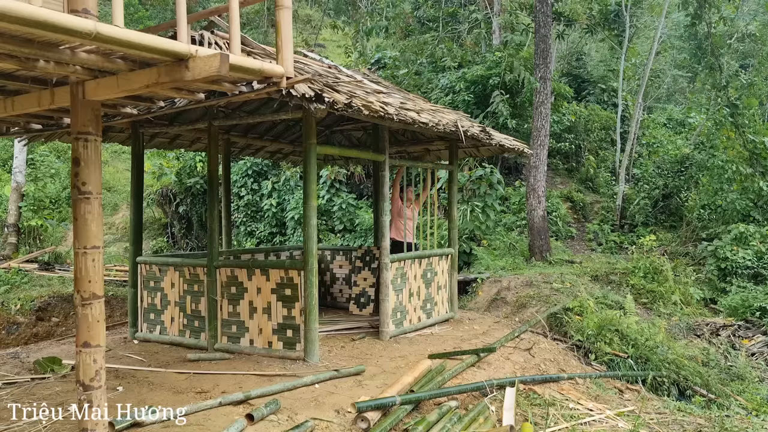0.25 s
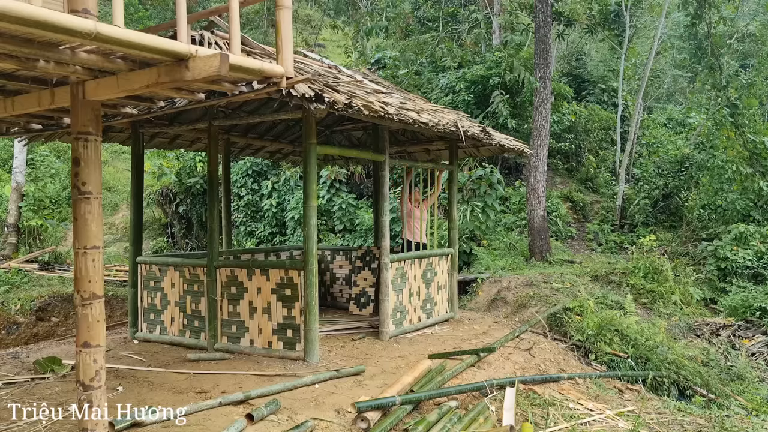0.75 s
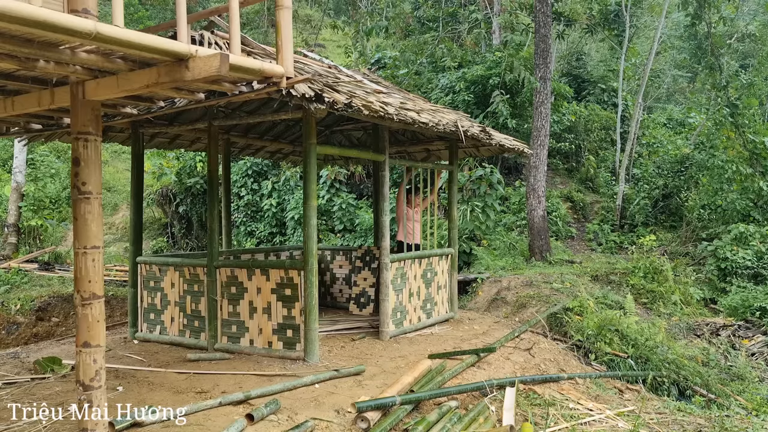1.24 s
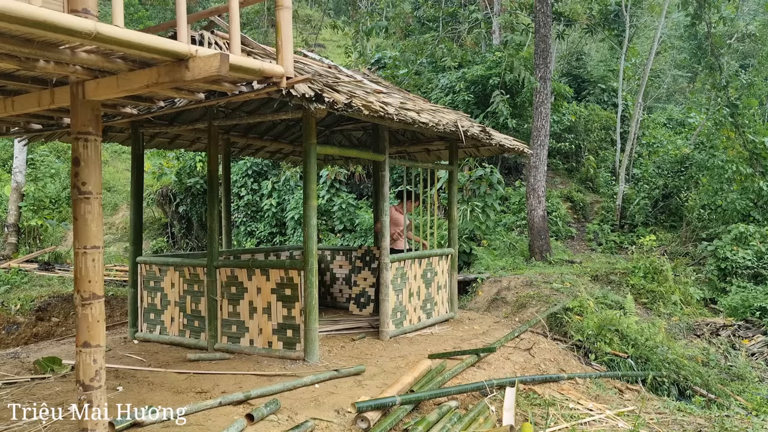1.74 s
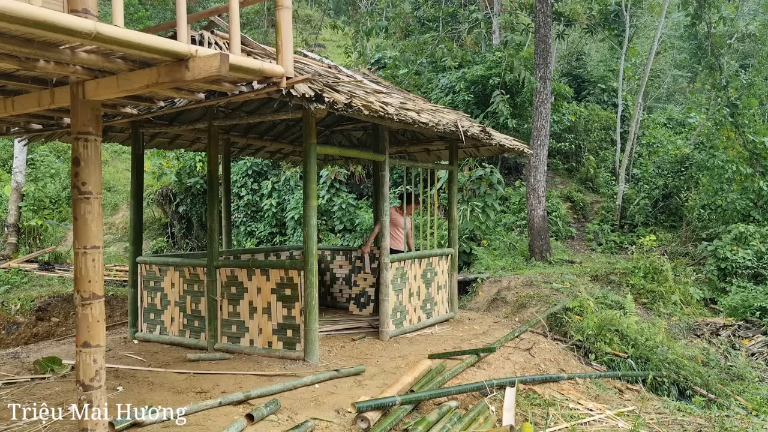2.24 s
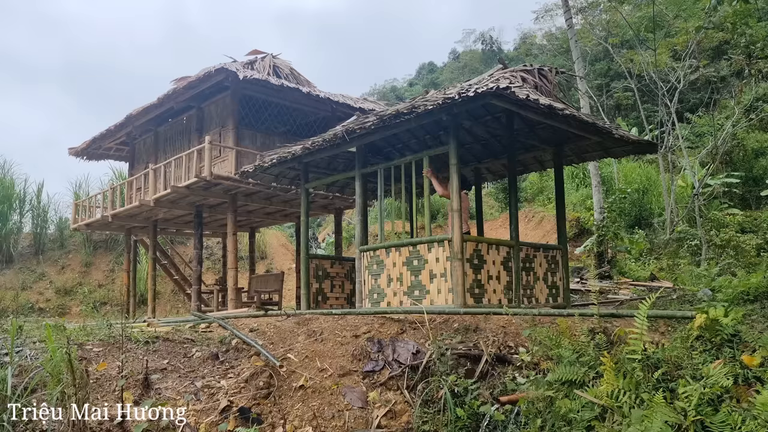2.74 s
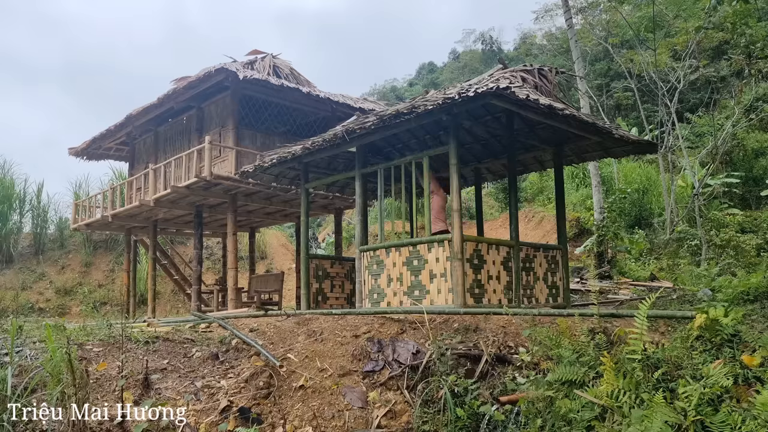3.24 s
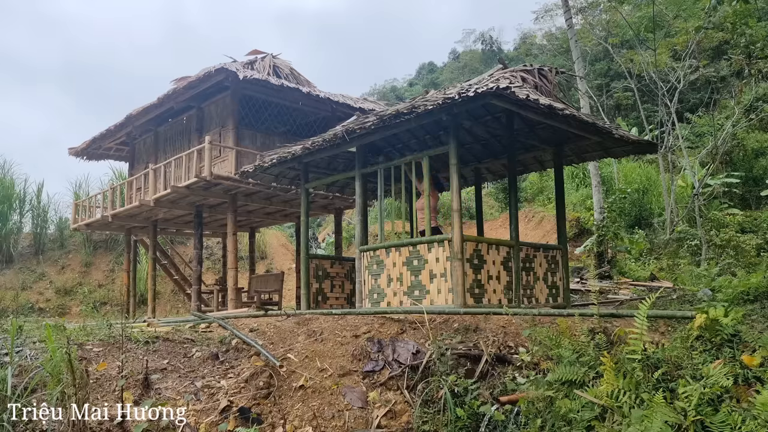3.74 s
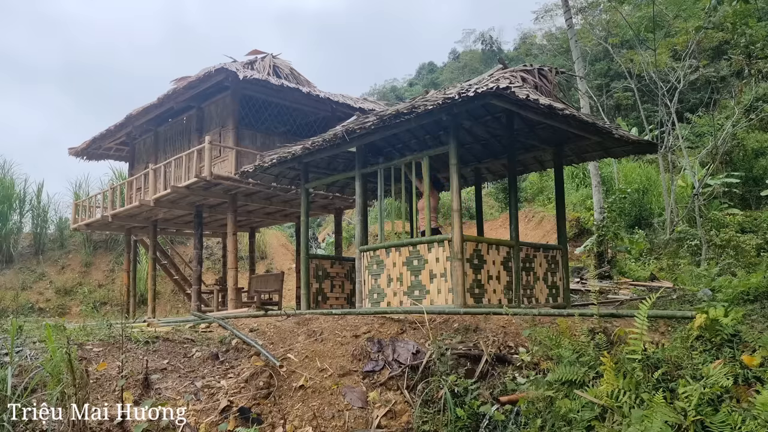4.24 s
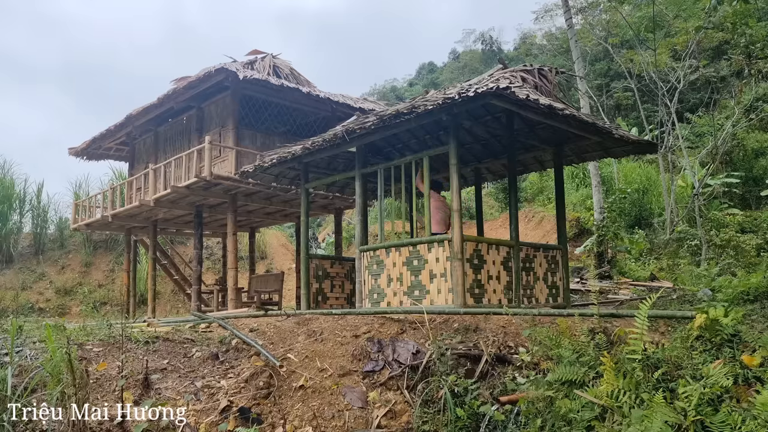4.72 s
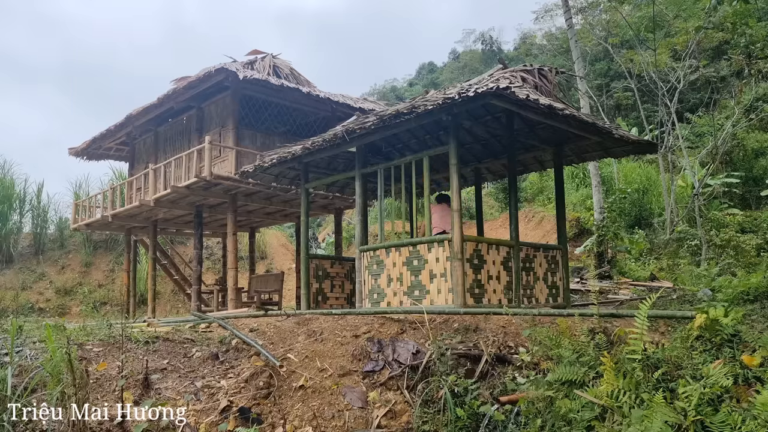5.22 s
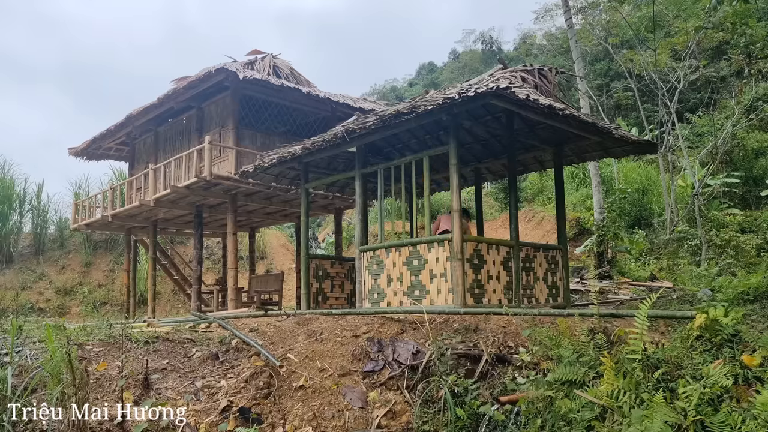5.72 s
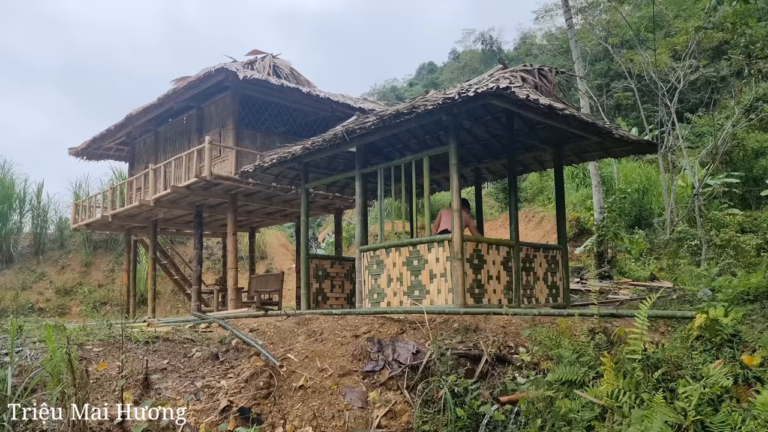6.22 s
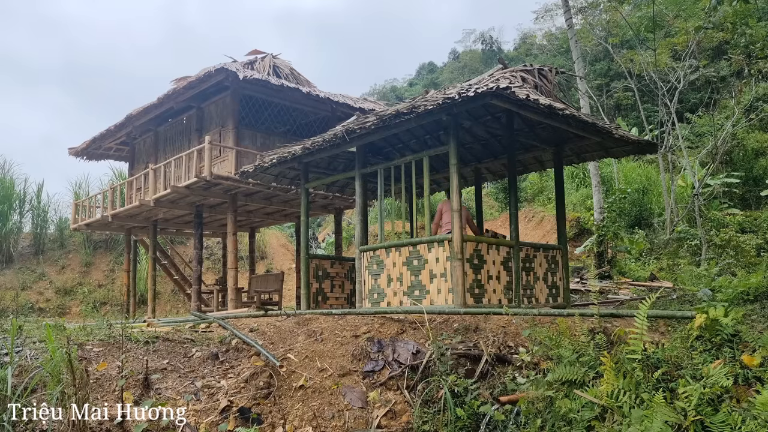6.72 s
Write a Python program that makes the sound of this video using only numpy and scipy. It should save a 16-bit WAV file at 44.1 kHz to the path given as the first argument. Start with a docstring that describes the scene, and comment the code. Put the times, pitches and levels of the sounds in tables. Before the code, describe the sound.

Sparse woody bamboo clacks and small taps over faint forest hiss; midway the ambience grows louder with cricket and cicada, then a pole scrapes.

```python
"""A faint forest hiss, soft hollow blips and a steady insect chorus open the scene: coloured, flickering noise,
small tuned taps and a narrow noise band. Over them five hollow blows of bamboo on a shelter frame ring banks of
damped modes under a noisy crack and shake the woven walls. A second thump and a rebound follow the first blows,
with small taps of handling throughout. From 2.6 s, at a second listening spot, the hiss is louder, the chorus
grows, and a cricket, a sagging cicada and a high trill join in. Near the end a pole slides along the frame with
a dry scrape of gritty noise."""
import sys
import numpy as np
from scipy import signal
from scipy.fft import rfft, irfft, next_fast_len
from scipy.io import wavfile
from scipy.ndimage import uniform_filter1d, map_coordinates

SR = 44100
rng = np.random.default_rng(int(sys.argv[2]) if len(sys.argv) > 2 else 0)


def transcribe(u):
    """Save the signal u as a 16-bit wav file named by the first command-line argument.

    u: samples, shape (n,) or (channels, n), limited to [-1, 1]; the rate is SR.
    q: integer samples, one column per channel.
    """
    v = np.clip(np.atleast_2d(u).T, -1, 1)
    q = np.round(v * 32767).astype(np.int16)
    wavfile.write(sys.argv[1], SR, q)


N = 307377  # length in samples

# Colour of the hiss at the first spot: [f/Hz, level per Hz/dB]
NEAR_HISS = [(25, -58), (62, -13), (100, -9.5), (160, -19), (220, -6.5), (380, -10), (560, -2.5),
             (850, -8.5), (1300, -8.5), (2000, -11.5), (4000, -16), (7500, -22.5), (9500, -28),
             (15500, -28)]
# Colour of the hiss at the second spot: [f/Hz, level per Hz/dB]
FAR_HISS = [(25, -62), (45, -45), (70, -12), (150, -14), (220, -6.5), (350, -10.5), (800, -11.5),
            (1500, -16), (3200, -8), (4700, -21), (7000, -15), (9000, -22), (11200, -27), (13000, -18.5),
            (15500, -24)]
# Broad resonances added to the second hiss: [f/Hz, width/Hz, level/dB]
FAR_HISS_HUMPS = [(222, 61, 9), (526, 136, 8), (1110, 170, 13), (1626, 396, 13.5), (2260, 260, 8)]
# Left-right likeness of the open air: [f/Hz, likeness 0..1]
AIR_LIKENESS = [(100, 0.87), (290, 0.96), (640, 0.13), (1400, 0), (15000, 0)]
# Depth of the flutter in the hiss: [f/Hz, share of full depth]
FLUTTER_DEPTH = [(100, 0.25), (250, 0.62), (3000, 0.8), (9000, 0.68)]
# Colour of the leaf rustle: [f/Hz, level per Hz/dB]
RUSTLE_COLOUR = [(150, -29), (500, -4.0), (1600, -19.0), (3500, -10), (8000, -22.5)]
# Colour of the leaf ticks: [f/Hz, level per Hz/dB]
TICK_COLOUR = [(800, -33), (3000, 9.0), (15000, -1.0)]
# Left-right likeness of knocks and taps: [f/Hz, likeness 0..1]
KNOCK_LIKENESS = [(100, 0.99), (300, 0.82), (700, 0.068), (1400, 0.01), (3000, 0.28), (7000, 0.069)]
# The five blows: [t/s, clack level/dB, hollow level/dB, crack level/dB, snap level/dB,
# wall thump level/dB, wall rattle level/dB, hollow f/Hz, rise/s, pole number]
BLOWS = [(0.0612, -26.5, -34.5, -30.5, -47, -45, -41, 360, 0.0053, 3),
         (0.7568, -18, -32.5, -22.5, -34.5, -47.5, -43, 283, 0.0054, 0),
         (1.0401, -26, -33, -32.5, -43, -47, -54, 284, 0.0062, 4),
         (3.6367, -21, -38, -24.5, -32, -44.5, -39, 292.5, .0005, 1),
         (4.1556, -22.5, -47, -27.5, -40.5, -49.5, -38, 290, 0.00037, 2)]
# Modes of each of the five poles: [f/Hz, relative level/dB, t60/s]
POLE_MODES = [
    [(473, -8, 0.04), (546, 4, 0.037), (608, 2, 0.046), (660, -7, 0.059), (804, -22, .1), (990, -7, 0.087),
     (1045, -6, 0.11), (1290, -5, 0.058), (1440, -9.5, 0.045), (1703, -12, 0.067), (1960, -22, .12),
     (2190, -31, 0.073), (2540, -10, 0.06), (2540, -16, 0.1), (3050, -26, 0.12), (3900, -19, 0.11),
     (5040, -20, 0.11)],
    [(606, -4.5, 0.049), (658, -15, 0.12), (705, 0.5, 0.043), (883, -4, 0.079), (970, 0, 0.12),
     (1046, -5, 0.086), (1203, 0, 0.077), (1370, 1.5, 0.058), (1580, -21, 0.052), (1740, -6.5, 0.034),
     (1955, -3.5, 0.054), (2590, -11, 0.071), (2884, -5, 0.049), (3020, -23, 0.042), (3370, -10.5, 0.064),
     (3750, -6, 0.037), (4720, -33, 0.09), (5070, -10.5, 0.057), (6370, -20, .05)],
    [(622, -13, 0.12), (720, -33, 0.059), (1020, 8.5, 0.031), (1092, 4.5, 0.054), (1376, 0, 0.033),
     (1590, -2, 0.03), (1897, -1.5, 0.028), (2335, -2, 0.044), (2570, -9, 0.057), (2880, -7.5, 0.068),
     (3370, -6, 0.033), (4400, -15, 0.051)],
    [(428, -6.5, 0.078), (530, -5, 0.039), (630, -7.5, 0.044), (823, -15, 0.11), (1030, 1, 0.083),
     (1310, -10, 0.073), (1570, -9, 0.059), (1774, 2.5, 0.031), (2696, -5, 0.053), (2990, -9.5, 0.067),
     (3960, -18, 0.12)],
    [(554, -9.5, 0.15), (616, -7, 0.13), (1007, 3.5, 0.035), (1113, -6.5, 0.1), (1344, -6, 0.11),
     (1560, -11, 0.097), (1780, -13, 0.1), (2050, -10.5, 0.092), (2560, -10, 0.063)],
]
# Colour of pole skin cracking and buzzing on the frame: [f/Hz, level per Hz/dB]
CLATTER_COLOUR = [(100, -6), (300, -5.5), (600, -4.5), (1200, 0), (1700, -5.5), (3000, -8), (5000, -15.5),
                  (7500, -15), (10000, -26), (15500, -30)]
# Dying away of the shelter's tail: [f/Hz, t60/s]
SHELTER_DECAY = [(200, 0.31), (1000, 0.21), (3000, 0.18), (10000, 0.18)]
# Colour of the echo from the trees: [f/Hz, level per Hz/dB]
TREE_COLOUR = [(200, -26), (1000, -2), (4000, -5), (15000, -27)]
# Edges of the registers hollow, clack, crack and snap, low to high: [f/Hz]
REGISTER_EDGES = (190, 450, 1600, 4500, 15800)
# Sway of the woven walls: [f/Hz, relative level/dB]
WALL_SWAY = [(56, 8), (90, -2.5), (135, -21), (178, -7), (215, -18)]
# Colour of the wall rattle: [f/Hz, level per Hz/dB]
RATTLE_COLOUR = [(25, -32), (55, 4.5), (120, -1), (180, -5.5), (300, -2.5), (450, -6.5), (800, -7), (2000, -40)]
# Clear taps: a second thump just after the first blow, a rebound after the second, then taps of handling: [t/s,
# level/dB (the first 10 ms sit 2 dB lower), f/Hz, t60/s]
CLEAR_TAPS = [(0.117, -34.5, 446, 0.053), (.56, -53, 5950, 0.011), (0.879, -46.5, 922, 0.11),
              (1.315, -47.5, 745, 0.054), (1.397, -50, 3560, 0.0085), (1.514, -43, 1100, 0.063),
              (1.731, -48, 595, 0.1), (1.933, -48, 757, 0.031), (2.571, -47.5, 557, 0.032),
              (3.387, -45.5, 1260, 0.021), (3.812, -44, 1134, 0.058), (4.259, -34, 1556, 0.027),
              (4.934, -45, 1410, .04), (5.225, -45, 554, 0.029), (6.268, -43.5, 1496, 0.066)]
# Cricket bouts: [start t/s, end t/s, level/dB]
CRICKET_BOUTS = [(2.639, 3.166, -56.5), (4.199, 7.1, -55)]
# Trills of a high bush cricket; overlapping ones add up: [start t/s, end t/s]
TRILL_BOUTS = [(2.65, 3.32), (3.42, 4.7), (3.98, 4.2)]
# Strokes of the sliding pole: [peak t/s, level/dB, rise/s, fall/s]
SLIDE_STROKES = [(5.738, -23, 0.012, 0.019), (5.775, -39, 0.038, 0.081), (5.877, -39, 0.011, 0.07)]
# Colour of the scrape: [f/Hz, level per Hz/dB]
SCRAPE_COLOUR = [(120, -37), (250, -26.5), (600, -15), (800, -10), (1150, -6), (1600, -9.5), (2800, -4),
                 (3500, -10), (4500, -11.5), (7500, -15), (10000, -24), (15500, -29)]
# Left-right likeness of the scrape: [f/Hz, likeness 0..1]
SCRAPE_LIKENESS = [(300, 1.0), (1500, 0.23), (6000, 0)]

MOVE_S = 2.645  # the background passes to the second listening spot
NEAR_DB, FAR_DB = -57, -48  # hiss at the first and the second spot
SWELL_AT_S, SWELL_WIDTH_S, SWELL_DB = 1.1, 0.37, 1.5  # one gentle swell of the first hiss
BLIPS_PER_S, BLIP_DB, BLIP_SCATTER_DB = 7, -55.5, 2
BLIP_HZ, BLIP_SCATTER_OCTAVES, BLIP_T60_S = 571, 0.192, .09
CHORUS_DB, CHORUS_GROWS_DB_PER_S = -62, 0.74  # growth begins at the second spot
LEAD_S = .02  # room for the brush ahead of each landing
HOLLOW_DB, HOLLOW_PEAK_S = -7.5, 0.011  # air in the tube: level among the modes, time to full strength
CHIRPS_PER_S, CRICKET_ATTACK_S, CRICKET_RELEASE_S = 21.14, 0.034, 0.025
CICADA_HZ, CICADA_SAG_HZ_PER_S, CICADA_DB = 7820, 1100, -60
CICADA_END_S, CICADA_ATTACK_S, CICADA_RELEASE_S = 4.33, 0.025, 0.37
TRILL_HZ, TRILL_DB, TRILL_FADE_S = 7940, -68, 0.037
TOP_HZ = 15750  # upper limit of the whole mix


def amp(db):
    """Decibels to gain."""
    return 10 ** (np.asarray(db) / 20)


def unit(x):
    """Scaled to rms 1."""
    return x / np.sqrt(np.mean(x ** 2) + 1e-20)


def along(points, hz):
    """Reads a curve of (Hz, value) points on a log frequency axis."""
    f, v = np.transpose(points)
    return np.interp(np.log(hz + 1), np.log(f + 1), v)


def wobble(rate):
    """A smooth random curve, rate knots a second."""
    knots = rng.standard_normal(int(N * rate / SR) + 4)
    return map_coordinates(knots, [np.arange(N) * rate / SR])


def filtered(x, response):
    """Shapes the spectrum of x by a response of frequency."""
    m = next_fast_len(x.shape[-1] + 8192)
    spectrum = rfft(x, m) * response(np.fft.rfftfreq(m, 1 / SR))
    return irfft(spectrum, m)[..., :x.shape[-1]]


def noise(colour, alike, size):
    """Stereo noise of rms 1: colour gives dB per frequency, the mid-side balance sets the likeness."""
    def mid_side_response(hz):
        angle = np.arccos(np.clip(along(alike, hz), -1, 1)) / 2
        return amp(colour(hz)) * np.array([np.cos(angle), np.sin(angle)])
    mid, side = filtered(rng.standard_normal((2, size)), mid_side_response)
    return unit(np.array([mid + side, mid - side]))


def coloured(points, alike, size):
    """Stereo noise coloured by a table."""
    return noise(lambda hz: along(points, hz), alike, size)


def narrow(hz, width_hz):
    """Stereo band of noise: slow noise rides on a fixed or moving pitch."""
    slow = filtered(rng.standard_normal((2, 2, N)), lambda f: 1 / (1 + (f / width_hz) ** 2))
    phase = 2 * np.pi * np.cumsum(hz * np.ones(N)) / SR
    return unit(slow[0] * np.cos(phase) + slow[1] * np.sin(phase))


def held(start, end, attack, release):
    """An envelope that rises from start, holds at 1 and has died away at end."""
    t = np.arange(N) / SR
    return np.clip(np.minimum((t - start) / attack, (end - t) / release), 0, 1)


def add(track, s, sound):
    """Mixes a sound into the track at time s."""
    part = track[:, max(round(s * SR), 0):][:, :sound.shape[1]]
    part += sound[:, :part.shape[1]]


def ring(modes, t, spread):
    """Damped sine modes with random level and phase, and a phase gap between left and right."""
    out = np.zeros((2, len(t)))
    for hz, db, t60 in modes:
        size, phase, skew = rng.standard_normal(3)
        apart = (spread * skew + 0.093) * hz / 1000 * np.array([[.5], [-.5]])
        decay = amp(db + 0.31 * size - 60 * t / t60)
        out += decay * np.sin(2 * np.pi * hz * t + np.pi * phase + apart)
    return out


def tap(db, pitch_hz, t60, scuff_db, width=0.23):
    """One damped resonance rings briefly under a soft scuff of noise around the same pitch."""
    t = np.arange(SR // 4) / SR
    scuff = noise(lambda hz: -10 * np.log10(1 + (np.log((hz + 1) / pitch_hz) / width) ** 4),
                  KNOCK_LIKENESS, len(t))
    body = ring([(pitch_hz, 3, t60)], t, spread=0.61) + scuff * amp(scuff_db - 60 * t / t60)
    sound = body * (1 - np.exp(-t / 0.0009))
    return amp(db - 2) * sound / np.std(sound[:, :SR // 100])  # level set over the first 10 ms


def patchy(x, depth_db):
    """Brief random flutters of gain across time and frequency, deepest around 3 kHz."""
    hz, _, z = signal.stft(x, SR, nperseg=256)
    field = rng.standard_normal(z.shape[1:])
    field = uniform_filter1d(field, size=4, axis=0)
    field = unit(uniform_filter1d(field, size=4, axis=1))
    depth = depth_db * along(FLUTTER_DEPTH, hz)[:, None]
    return unit(signal.istft(z * amp(depth * field), SR, nperseg=256)[1][:, :N])


def far_colour(hz):
    """Hiss of the second spot in dB: its broad slope plus resonant humps."""
    humps = sum(db / (1 + (2 * (hz - centre) / width) ** 2) for centre, width, db in FAR_HISS_HUMPS)
    return along(FAR_HISS, hz) + humps


def forest():
    """Restless hiss of the clearing as fluttering noise, with leaves rustling and ticking in it."""
    t = np.arange(N) / SR
    moved = np.clip((t - MOVE_S) / 0.011 + .5, 0, 1)  # 11 ms crossfade between the spots
    swell_db = SWELL_DB * np.exp(-((t - SWELL_AT_S) / SWELL_WIDTH_S) ** 2)
    near_hiss = patchy(coloured(NEAR_HISS, AIR_LIKENESS, N), depth_db=3.0)
    first = amp(NEAR_DB + swell_db) * near_hiss
    far_hiss = patchy(noise(far_colour, AIR_LIKENESS, N), depth_db=5.5)
    second = amp(FAR_DB + 0.42 * wobble(17)) * far_hiss
    rustle = unit(amp(5.1 * wobble(70)) * coloured(RUSTLE_COLOUR, AIR_LIKENESS, N))
    # the bent curve leaves only short peaks standing out as ticks
    tick_gain = amp(10 * np.tanh(wobble(700) - 1.8))
    ticks = unit(tick_gain * coloured(TICK_COLOUR, AIR_LIKENESS, N))
    leaves = amp(-70) * rustle + amp(-68.5) * ticks
    return (1 - moved) * first + moved * second + amp(10.0 * moved) * leaves  # leaves rise 10 dB


def blips():
    """Faint hollow blips: small resonances, unevenly spaced, scattered around one pitch."""
    out = np.zeros((2, N))
    for k, (late, size, pitch) in enumerate(rng.standard_normal(size=(80, 3))):
        s = abs(k + .5 * late) / BLIPS_PER_S
        db = BLIP_DB + BLIP_SCATTER_DB * size
        pitch_hz = BLIP_HZ * 2 ** (BLIP_SCATTER_OCTAVES * pitch)
        add(out, s, tap(db, pitch_hz, BLIP_T60_S, scuff_db=-8.5))
    return out


def chorus():
    """Far insects blur into one steady narrow band, which grows louder at the second spot."""
    since = np.maximum(np.arange(N) / SR - MOVE_S, 0)
    return amp(CHORUS_DB + CHORUS_GROWS_DB_PER_S * since) * narrow(6327, width_hz=255)


def hollow_ring(pitch_hz, t):
    """The air column in the tube takes a few cycles to get going, then dies away."""
    swell = (t / HOLLOW_PEAK_S * np.exp(1 - t / HOLLOW_PEAK_S)) ** 1.25
    return amp(HOLLOW_DB) * swell * np.sin(2 * np.pi * (pitch_hz * t + rng.random()))


def pole_chatter(since, t):
    """The pole brushes the frame around its landing, then its hard skin cracks and buzzes."""
    brush = amp(-14) * np.exp(-abs(since) / 0.0033)
    crack = amp(-1.0 - 60 * t / 0.004)
    buzz = amp(-5 - 60 * t / 0.13)
    strike = (crack + buzz) * (1 - np.exp(-t / 0.00028))
    return (brush + strike) * coloured(CLATTER_COLOUR, KNOCK_LIKENESS, len(t))


def shelter_tail(t):
    """The shelter's answer: noise that dies away at its own rate in each frequency band."""
    hz, when, z = signal.stft(coloured(CLATTER_COLOUR, KNOCK_LIKENESS, len(t)), SR, nperseg=256)
    decay = amp(-60 * (when - LEAD_S) / along(SHELTER_DECAY, hz)[:, None])
    return signal.istft(z * decay, SR, nperseg=256)[1][:, :len(t)]


def tree_echo(t):
    """The trees scatter back a faint, longer echo of decaying noise."""
    return coloured(TREE_COLOUR, AIR_LIKENESS, len(t)) * amp(-28.0 - 60 * t / 0.78)


def blow(levels_db, hollow_hz, pole):
    """The pole chatters against the frame and rings, and the shelter and trees answer."""
    since = np.arange(SR // 2) / SR - LEAD_S
    t = np.maximum(since, 0)
    modes = ring(POLE_MODES[int(round(pole))], t, spread=0.12) * (1 - np.exp(-t / 0.0019))
    modes = modes + hollow_ring(hollow_hz, t)
    # the contact is hardest while the pole seats itself
    seating = 1 + 1.0 * np.exp(-((t - .0045) / 0.0043) ** 2)
    direct = seating * (modes + pole_chatter(since, t))
    answer = (amp(-6) * shelter_tail(t) + tree_echo(t)) * (1 - np.exp(-t / 0.0018))
    sound = direct + answer
    # where and how hard the pole is hit sets the strength of each register
    out = np.zeros_like(sound)
    for lo, hi, db in zip(REGISTER_EDGES, REGISTER_EDGES[1:], levels_db):
        band = signal.butter(3, (lo, hi), "band", fs=SR, output="sos")
        part = signal.sosfilt(band, sound)
        out += amp(db) * part / np.std(part[:, abs(since - .014) < .019])  # level set around the onset
    return out


def wall_shake(thump_db, rattle_db, thump_s=0.061, rattle_s=0.033):
    """The light walls take up the blow slowly: a low thump of sines and a dull noise rattle."""
    t = np.arange(SR // 2) / SR
    swell = lambda peak_s: (t / peak_s * np.exp(1 - t / peak_s)) ** 2
    sway = unit(sum(amp(db) * np.sin(2 * np.pi * (hz * t + rng.random())) for hz, db in WALL_SWAY))
    thump = amp(thump_db) * sway * swell(thump_s) ** 2
    rattle = coloured(RATTLE_COLOUR, KNOCK_LIKENESS, len(t))
    return thump + amp(rattle_db) * rattle * swell(rattle_s)


def knocks():
    """Each blow builds up as the lashing takes the load, rings a pole and shakes the walls."""
    out = np.zeros((2, N))
    since = np.maximum(np.arange(SR // 2) / SR - LEAD_S, 0)
    for s, clack_db, hollow_db, crack_db, snap_db, thump_db, rattle_db, hollow_hz, rise, pole in BLOWS:
        load = 1 - 0.64 * np.exp(-(since / rise) ** 2)
        levels_db = (hollow_db, clack_db, crack_db, snap_db)
        add(out, s - LEAD_S, load * blow(levels_db, hollow_hz, pole))
        add(out, s, wall_shake(thump_db, rattle_db))
    return out * amp([[.3], [-.3]])  # leans slightly left


def taps():
    """A second thump and a rebound follow the first two blows, then light touches on the poles while they are
    handled, each one a short scuffed resonance."""
    out = np.zeros((2, N))
    for s, db, pitch_hz, t60 in CLEAR_TAPS:
        add(out, s, tap(db, pitch_hz, t60, scuff_db=2))
    return out


def cricket(wing_hz=6245, sag_hz=45, smear=1.14):
    """Bouts of even chirps; pitch sways with each wing stroke and the foliage smears its phase."""
    t, out = np.arange(N) / SR, np.zeros((2, N))
    for start, end, db in CRICKET_BOUTS:
        beat = 2 * np.pi * ((t - start) * CHIRPS_PER_S + 0.047 * wobble(5.1))
        chirps = unit((.5 - .5 * np.cos(beat)) ** 2 * amp(0.45 * wobble(12)))
        pitch_hz = wing_hz + sag_hz * np.sin(beat)
        foliage = smear * np.array([wobble(70), wobble(70)])
        phase = 2 * np.pi * np.cumsum(pitch_hz) / SR + foliage
        bout = held(start, end, CRICKET_ATTACK_S, CRICKET_RELEASE_S)
        out += amp(db) * bout * chirps * np.sin(phase)
    return out


def cicada():
    """A narrow noise band holds its level while its pitch sags steadily, then fades out, still sagging."""
    since = np.maximum(np.arange(N) / SR - MOVE_S, 0)
    effort = held(MOVE_S, CICADA_END_S, CICADA_ATTACK_S, CICADA_RELEASE_S)
    return amp(CICADA_DB) * effort * narrow(CICADA_HZ - CICADA_SAG_HZ_PER_S * since, width_hz=250)


def trill():
    """A high bush cricket sings a thin noise band that fades in and out."""
    singing = sum(held(start, end, TRILL_FADE_S, TRILL_FADE_S) for start, end in TRILL_BOUTS)
    return amp(TRILL_DB) * singing * narrow(TRILL_HZ, width_hz=80)


def scrape(grain_db=1.5, catch_db=1.4):
    """A pole slides along the frame in overlapping strokes of fine, uneven slips and slower catches."""
    t = np.arange(N) / SR
    push = sum(amp(db) * np.exp(-np.maximum((s - t) / rise, (t - s) / fall))
               for s, db, rise, fall in SLIDE_STROKES)
    slips = unit(amp(grain_db * wobble(1400) + catch_db * wobble(350)))
    return push * slips * coloured(SCRAPE_COLOUR, SCRAPE_LIKENESS, N)


def scene():
    """The work on the shelter amid the forest."""
    background = forest() + blips() + chorus()
    work = knocks() + taps() + scrape()
    singers = cricket() + cicada() + trill()
    return background + work + singers


def record(dry):
    """Rounds off the highest peaks by soft saturation, then cuts steeply above the upper limit."""
    rounded = dry / (1 + np.abs(dry / .58) ** 6) ** (1 / 6)
    return filtered(rounded, lambda hz: 1 / (1 + (hz / TOP_HZ) ** 200))


dry = scene()
out = record(dry)
transcribe(out)
```